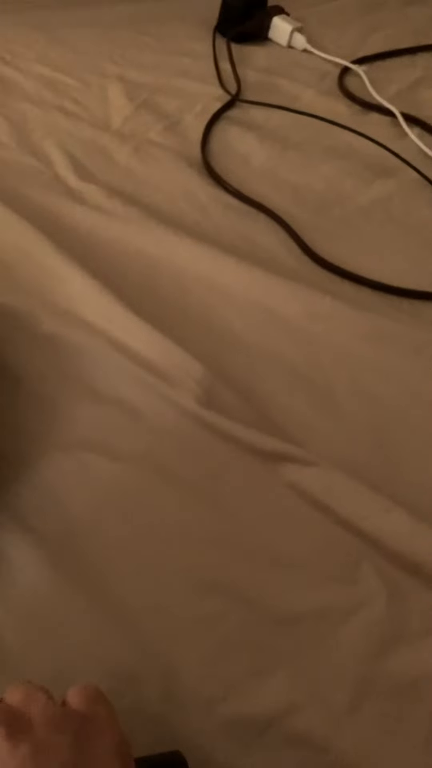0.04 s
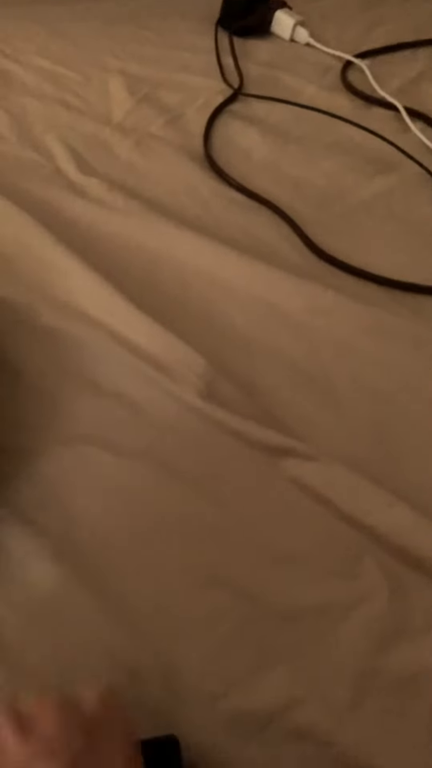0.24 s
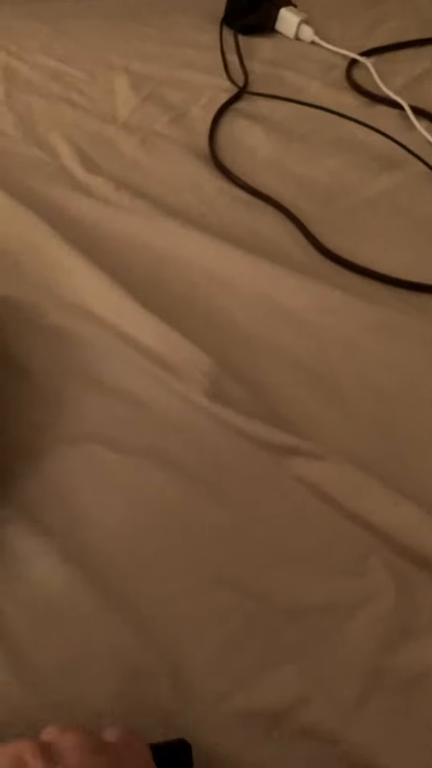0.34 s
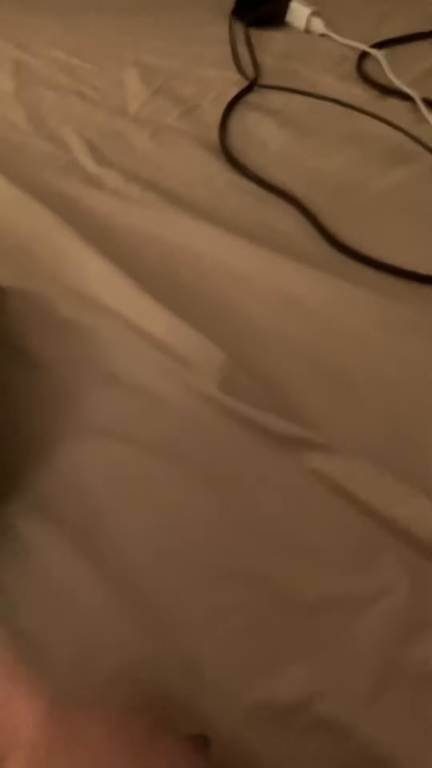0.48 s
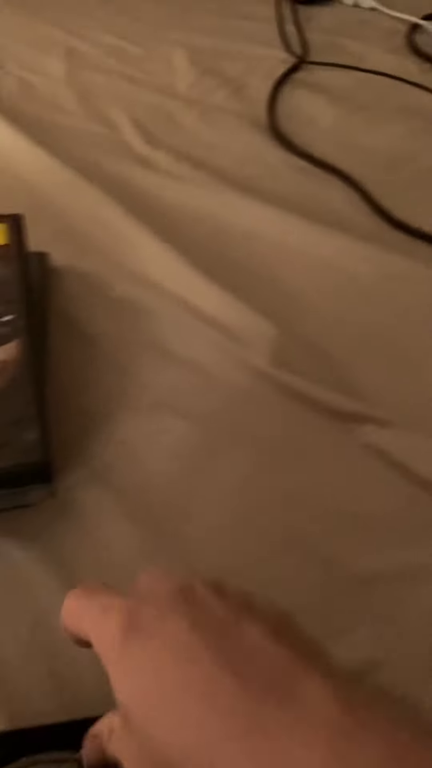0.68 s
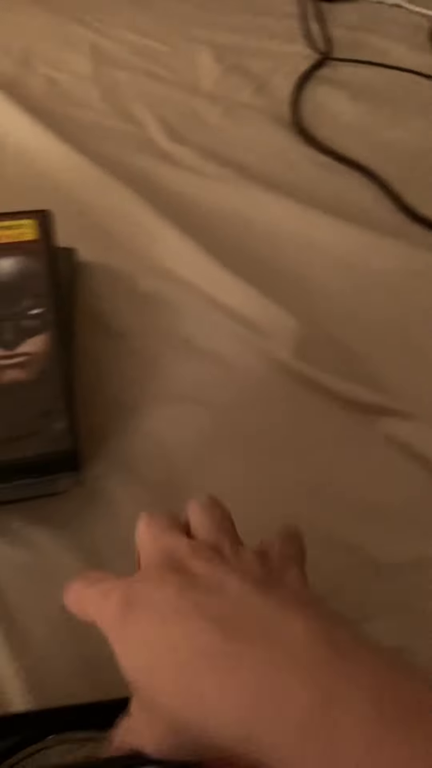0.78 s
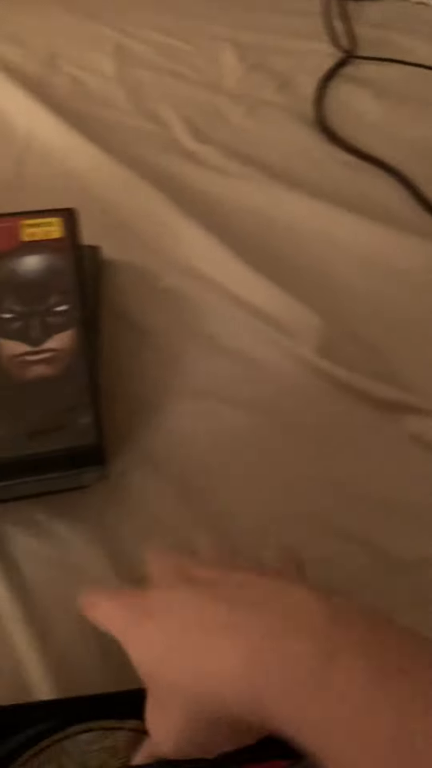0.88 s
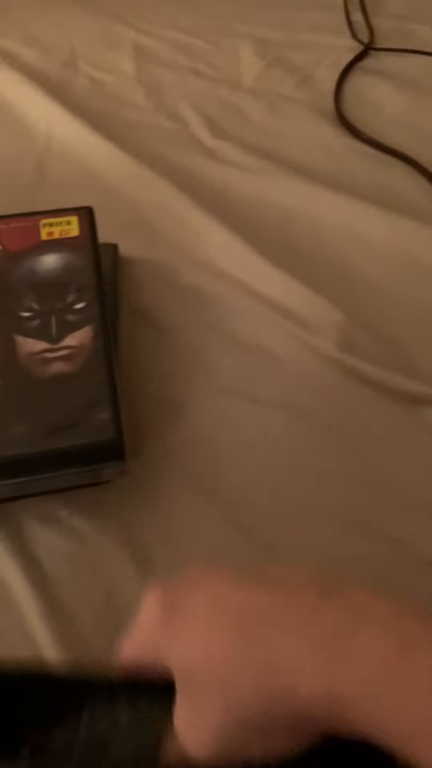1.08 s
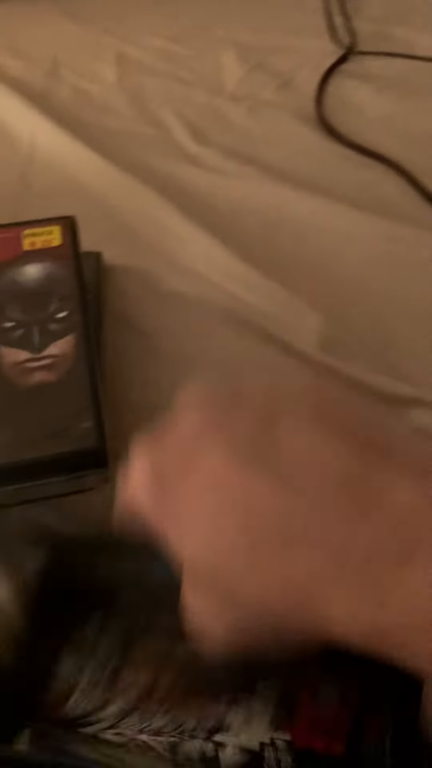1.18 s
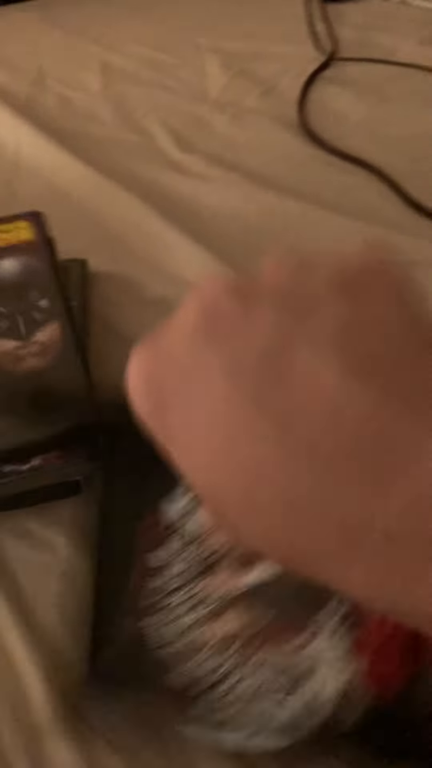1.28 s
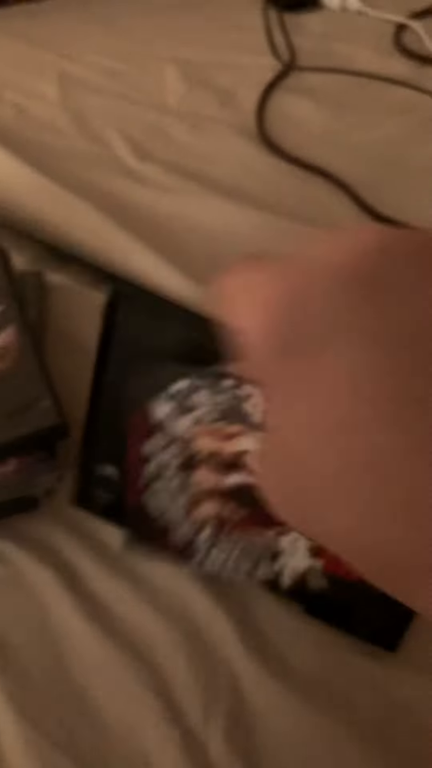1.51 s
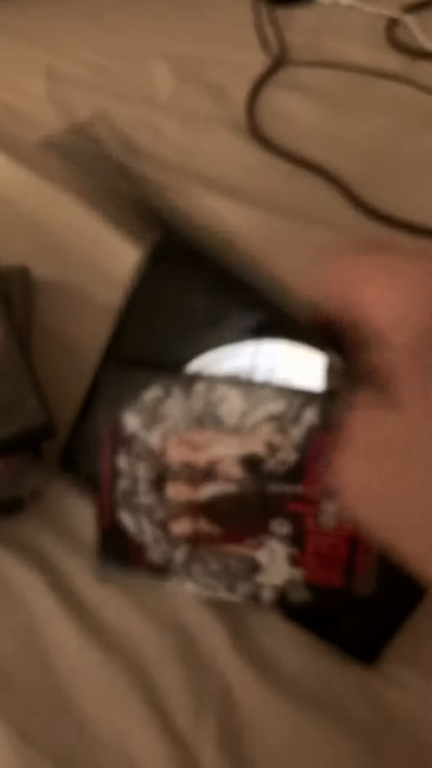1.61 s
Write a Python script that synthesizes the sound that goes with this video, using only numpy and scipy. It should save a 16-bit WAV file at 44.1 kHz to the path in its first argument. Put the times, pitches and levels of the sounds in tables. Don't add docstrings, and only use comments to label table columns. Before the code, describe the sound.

A thin plastic disc case is handled close to a phone in a damped bedroom. After near silence, a loud cluster of cracks with a hollow thump bursts at 0.2 s. Light clicks and slides follow from 0.4 to 0.65, then knocks, loose rattling and rustling from 0.87, a faint finger squeak near 1.13, a second sharp snap at 1.23, and dwindling taps to about 1.6.

```python
import sys
import numpy as np
from scipy import signal
from scipy.fft import rfft, irfft, next_fast_len
from scipy.io import wavfile
from scipy.ndimage import map_coordinates

SR = 44100
rng = np.random.default_rng(int(sys.argv[2]) if len(sys.argv) > 2 else 0)


def put_to_file(sound):
    columns = np.atleast_2d(sound).T
    safe = np.clip(columns, -1, 1)
    whole_steps = np.round(safe * 32767)
    wavfile.write(sys.argv[1], SR, whole_steps.astype(np.int16))


def boost(x):
    u = np.asarray(x, float) / 20
    return 10 ** u


N = 72765

# pitch_hz, level_db [dB per Hz]
AIR_SPECTRUM = [(15, -48.5), (25, 0.5), (140, -3.5), (312, -17.5), (499, -17), (859, -35), (1960, -36.5),
                (7000, -39.5), (9100, -61.5), (15400, -120)]
# pitch_hz, t60_s
ROOM_DECAY = [(200, 0.21), (2000, 0.15), (10000, 0.29)]
# pitch_hz, level_db [dB per Hz]
FILM_SPECTRUM = [(500, -1), (1200, -9), (2500, -6), (4500, -10.5), (6000, 2), (8500, -3.5), (11500, -4.5),
                 (15500, -21.5)]
# pitch_hz, width_hz, level_db
BODY_MODES = [(337, 108, -4), (400.4, 80, -1), (473.6, 102, -2), (591, 126, -2)]
# pitch_hz, width_hz, level_db
SHELL_MODES = [(1021, 190, 0.5), (1380, 195, 8), (1510, 730, 3), (2023, 160, 5), (2694, 250, -1),
               (3986, 870, -0.5), (4900, 1400, -3.5)]
# pitch_hz, width_hz, level_db
FIZZ_MODES = [(5840, 765, 1), (8330, 680, 0), (11000, 1700, -2), (13600, 2500, -21), (16080, 890, -20)]
# start_s, effort_db, body_pressure_db
RUB_GESTURES = [(0.185, -104.5, 17), (0.2, -47, 9), (0.268, -45.5, 1), (0.348, -70, 7.5), (.45, -75, 9),
                (.5, -61.5, -2.5), (0.622, -58.5, -12.5), (.67, -80, -12.5), (0.744, -77.5, -37),
                (0.804, -58, -16), (0.86, -61, -4.5), (0.903, -74, 4), (0.939, -46, 1), (1.03, -59.5, -2),
                (1.146, -63, -1), (1.175, -79, 4), (1.461, -73, 3.5), (1.65, -63, 1.5)]
# start_s, level_db, pitch_hz
THUMP_EVENTS = [(0.215, -28.5, 99), (0.231, -26, 70.4), (0.368, -51.5, 55.5), (0.467, -57.5, 65),
                (0.636, -54, 59.8), (0.912, -42.5, 96.4), (0.947, -42.5, 63), (1.041, -47.5, 123),
                (1.117, -58, 121), (1.257, -40.5, 103), (1.298, -35.5, 81), (1.36, -46.5, 95),
                (1.42, -49, 60), (1.507, -47, 111), (1.549, -45.5, 154)]
# start_s, pitch_hz, level_db
SQUEAK_PATH = [
    (1.113, 2400, -51),
    (1.133, 3100, -50),
    (1.14, 3700, -59),
    (1.152, 4300, -56),
]
# start_s, pitch_hz, level_db
SKID_PATH = [
    (.87, 4900, -52),
    (.885, 5400, -50),
    (.9, 5900, -50),
]
# start_s, shell_db, body_over_shell_db, fizz_over_shell_db
RATTLE_EVENTS = [
    (.9343, -36, -15, -6.5),
    (.958, -40, -5, -11),
    (.9675, -37, -16, 2),
    (1.013, -35, -11, -4),
    (1.0904, -40.5, -22, -10),
    (1.246, -28, 1, -1.5),
    (1.262, -36, 10, -1),
    (1.275, -37.5, -12, 0.5),
]
# start_s, shell_db, body_over_shell_db, fizz_over_shell_db
SLIDE_EVENTS = [(.323, -47, -24, 0), (.4814, -34.5, 7.5, -10.5), (.586, -58, -4, 14),
                (.622, -39.5, 15.5, -13), (.8713, -46, 20.5, 5.5), (.928, -48, 7, -15), (.964, -30, 8, -10),
                (1.008, -60, 12, -17), (1.216, -24, -25, -27), (1.312, -47, 12, 10.5), (1.494, -43, 12, -3),
                (1.508, -43, -12, 14.5)]
# start_s, shell_db, body_over_shell_db, fizz_over_shell_db
TICK_EVENTS = [(.405, -32.5, -1, -12), (.4254, -63, -1, -20), (.44, -51, -5, -26), (.5275, -30, -2, -26),
               (.535, -33, 0.5, -21), (.545, -36, 4, -19), (.557, -52, 11, -9), (.58, -37, 8.5, -14),
               (.9118, -30, 13, -3.5), (.9507, -29.5, 0, -16), (.9985, -24.5, 2.5, -18),
               (1.0536, -33, 7, -5.5), (1.1046, -34, -4, -7), (1.17, -52, -17, -1), (1.1892, -39, 1, -11.5),
               (1.3525, -27, 1.5, -9), (1.3894, -32, 13, -4), (1.4155, -37, 5.5, -3), (1.4387, -39, 5, -9),
               (1.4701, -57.5, 25, 11), (1.48, -55.5, 24, 0), (1.5465, -34.5, 1, 4), (1.6024, -48, -11, 5)]
# start_s, pitch_hz, level_db
NUDGE_RINGS = [(.406, 278, -36), (.528, 1750, -39.5), (.528, 1130, -40.5), (.537, 500, -40),
               (.547, 1655, -41.5), (.558, 436, -34.5), (.581, 575, -45.5), (.586, 407, -35),
               (.625, 394, -36), (.634, 562, -42.5), (.913, 446, -29.5), (.913, 1690, -34),
               (.922, 260, -34.5), (.935, 1570, -42), (.941, 563, -30), (.951, 370, -23),
               (.951, 1540, -31.5), (.969, 404, -28), (.999, 385, -34), (1.014, 487, -36),
               (1.014, 1630, -43), (1.055, 510, -40), (1.353, 1530, -41.5), (1.358, 370, -39),
               (1.391, 1680, -45), (1.394, 370, -31), (1.413, 390, -31.5), (1.496, 273, -34.5),
               (1.503, 1660, -45.5), (1.549, 412, -28.5), (1.556, 330, -29.5), (1.602, 1330, -43)]
# start_s, shell_db, body_over_shell_db, fizz_over_shell_db
CRACK_EVENTS = [(0.2035, -6.5, 5.5, -28), (0.2112, -3, -0.5, -17.5), (0.2231, -17, 19.5, 2.5),
                (0.2287, -7.5, -8, -3.5), (0.2384, -17, 14, 8), (0.242, -12, -13, -24.5),
                (0.2554, -15, 5.5, 4), (0.2622, -11, -32, -9), (0.2824, -60, 1, -21),
                (0.3094, -42, -18, -23), (1.2084, -43, 9, -1), (1.2308, -12, 2, 5),
                (1.2347, -10.5, 9.5, -2), (1.2387, -8.5, -24, -12), (1.2544, -51, 14, -13),
                (1.2934, -29.5, 13.5, 7), (1.2994, -22, 5.5, 8), (1.3054, -23, 17.5, 3.5)]
# start_s, pitch_hz, level_db
PANEL_RINGS = [(.2035, 3820, -13.5), (.204, 560, -7.5), (.204, 2050, -15.5), (.2045, 1230, -13),
               (.208, 3750, -35), (.2115, 3800, -22), (.212, 1335, -10.5), (.216, 238, -12.5),
               (.222, 330, -8.5), (.223, 3240, -37), (.229, 3940, -23.5), (.232, 444, -19),
               (.238, 3470, -33), (.243, 3940, -26), (.245, 177, -14.5), (.255, 4700, -26),
               (.256, 308, -23), (1.225, 2450, -31), (1.23, 2600, -19.5), (1.233, 3800, -22.5),
               (1.2345, 1214, -11.5), (1.235, 350, -9), (1.241, 1496, -18), (1.242, 380, -19.5),
               (1.252, 430, -23), (1.294, 4300, -27.5), (1.294, 4030, -27.5), (1.3, 1540, -29.5),
               (1.304, 550, -18), (1.308, 160, -23)]
# pitch_hz, left_lead_rad
LEAD_BEFORE = [(550, 1.97), (900, 1.9), (1450, 1.73), (2000, 1.54), (2700, -2.5), (3700, 1.34), (4200, 1.1)]
# pitch_hz, left_lead_rad
LEAD_AFTER = [(550, 1.63), (800, 1.28), (1300, 1.02), (2100, -2.1), (2700, 2.05), (3800, 1.5), (4400, 1.57)]
# pitch_hz, left_lead_half_turns
TREBLE_STEPS = [(5250, .96), (5850, 1.04), (7800, 1.96), (9300, 2.05), (11100, 2.98), (12900, 3.02),
                (13800, 3.96), (16000, 4.02)]

AIR_DB, ROOM_DB = -70, -20
DIFFUSE_DB, DIFFUSE_TOP_HZ = -9.5, 5500
SCATTER_DB, SCATTER_T60_S = -13, 0.012
THUMP_T60_S, THUMP_RISE_S = 0.062, 0.0022
CRACK_T60_S, TICK_T60_S, KNOCK_T60_S = 0.014, 0.018, 0.035
RING_T60_S, RING_FASTER, RING_RISE_CYCLES = 0.021, 0.36, 0.48
TURN_S = 0.89
MONO_HZ, BASS_WIDTH = 620, 0.07
RUMBLE_CUT_HZ, TOP_HZ, CEILING = 43.6, 15900, 0.95


def unit(x):
    return x / np.sqrt(np.mean(x ** 2) + 1e-20)


def along(points, hz):
    f, v = np.transpose(points)
    return np.interp(np.log(hz + 1), np.log(f + 1), v)


def wobble(rate):
    knots = rng.standard_normal(int(N / SR * 1000))
    return map_coordinates(knots, [np.arange(N) * min(rate, 900) / SR])


def filtered(x, response):
    m = next_fast_len(N + SR // 2)
    return irfft(rfft(x, m) * response(np.fft.rfftfreq(m, 1 / SR)), m)[..., :N]


def resonate(x, modes):
    def shape(f):
        total = 0
        for k, (hz, width, db) in enumerate(modes):
            total = total + (-1) ** k * boost(db) * 1j * f * width / (hz * hz - f * f + 1j * f * width)
        return total
    return filtered(x, shape) / np.sqrt(np.mean(abs(shape(np.arange(1, SR // 2))) ** 2))


def air():
    level = boost(AIR_DB + 3.0 + 2.5 * wobble(67))
    hum = filtered(rng.standard_normal((2, N)), lambda hz: boost(along(AIR_SPECTRUM, hz)))
    return level * unit(hum)


def room(x):
    hz, t, z = signal.stft(rng.standard_normal((2, SR // 2)), SR, nperseg=256)
    decay = boost(-60 * t / along(ROOM_DECAY, hz)[:, None])
    tail = signal.istft(z * decay, SR, nperseg=256)[1]
    late = np.pad(x, (200, 0))
    return signal.fftconvolve(late[None], tail / np.linalg.norm(tail[0]), axes=1)[:, :N]


def glance(x):
    t = np.arange(SR // 50) / SR
    smear = rng.standard_normal((2, len(t))) * boost(-60 * t / SCATTER_T60_S)
    return signal.fftconvolve(x[None], smear / np.linalg.norm(smear[0]), axes=1)[:, :N]


def slips(rough_db):
    noise = rng.standard_normal(N)
    grip = boost(rough_db * wobble(400) + 3.15 * wobble(59.32))
    return unit(noise * grip)


def rubbing():
    s, effort_db, press_db = np.transpose(RUB_GESTURES)
    t = np.arange(N) / SR
    effort = boost(np.interp(t, s, effort_db, left=-120))
    press = np.interp(t, s, press_db)
    film = boost(10.0) * unit(filtered(slips(rough_db=1), lambda hz: boost(along(FILM_SPECTRUM, hz))))
    body = boost(press + 9.0) * resonate(slips(rough_db=1.5), BODY_MODES)
    shell = boost(press * 1.53 + 6.5) * resonate(slips(rough_db=1.5), SHELL_MODES)
    return effort * (film + body + shell)


def squeak(path):
    s, hz, db = np.transpose(path)
    t = np.arange(N) / SR
    pitch = np.interp(t, s, hz) * (1 + 0.015 * wobble(500))
    level_db = np.interp(t, s, db, left=-150, right=-150) + 3.7 * wobble(150)
    return boost(level_db) * np.sin(2 * np.pi * np.cumsum(pitch) / SR)


def thumps():
    out, t = np.zeros(N + SR), np.arange(SR // 4) / SR
    decay = boost(-60 * t / THUMP_T60_S)
    rise = 1 - np.exp(-t / THUMP_RISE_S)
    ratios = 1.9 + 0.59 * rng.standard_normal((len(THUMP_EVENTS), 2))[:, 1]
    for (s, db, hz), ratio in zip(THUMP_EVENTS, ratios):
        overtone = 0.87 * decay * np.sin(2 * np.pi * ratio * hz * t)
        flex = np.sin(2 * np.pi * hz * t) + overtone
        out[round(s * SR):][:len(t)] += boost(db + 18) * decay * rise * flex
    return out[:N]


def bursts(times, dbs, rise_s, t60_s):
    out, t = np.zeros(N + SR), np.arange(SR // 10) / SR
    shape = (1 - np.exp(-t / rise_s)) * boost(-60 * t / t60_s)
    for s, db in zip(times, dbs):
        puff = shape * rng.standard_normal(len(t))
        puff = puff / np.sqrt(np.sum(puff ** 2) / np.sum(shape ** 2))
        out[round(s * SR):][:len(t)] += boost(db) * puff
    return out[:N]


def contacts(rows, rise_s, t60_s, body_t60_s, shell_db, body_db, fizz_db):
    s, db, low, high = np.transpose(rows)
    shell = resonate(bursts(s, db + shell_db, rise_s, t60_s), SHELL_MODES)
    body = resonate(bursts(s, db + low + body_db, rise_s + 0.0013, body_t60_s), BODY_MODES)
    fizz = resonate(bursts(s, db + high + fizz_db, rise_s, t60_s), FIZZ_MODES)
    return shell + body + fizz


def rings(rows, gain_db):
    out, t = np.zeros(N + SR), np.arange(SR // 8) / SR
    for s, hz, db in rows:
        t60_s = RING_T60_S * (1000 / hz) ** RING_FASTER
        swell = 1 - np.exp(-t * hz / RING_RISE_CYCLES)
        decay = boost(db + gain_db - 60 * t / t60_s)
        out[round(s * SR):][:len(t)] += decay * swell * np.sin(2 * np.pi * hz * t)
    return out[:N]


def rattle():
    return contacts(RATTLE_EVENTS, 0.0016, 0.036, body_t60_s=0.053, shell_db=1, body_db=-4, fizz_db=2.5)


def slides():
    return contacts(SLIDE_EVENTS, 0.023, 0.079, body_t60_s=0.048, shell_db=1.5, body_db=0, fizz_db=9.0)


def ticks():
    taps = contacts(TICK_EVENTS, 0.00051, TICK_T60_S, KNOCK_T60_S, shell_db=-3.0, body_db=-8, fizz_db=0.5)
    return taps + rings(NUDGE_RINGS, gain_db=6)


def cracks():
    snaps = contacts(CRACK_EVENTS, 0.00071, CRACK_T60_S, body_t60_s=0.03,
                     shell_db=-1.5, body_db=-8.5, fizz_db=2.0)
    return snaps + rings(PANEL_RINGS, gain_db=4.5)


def ports(x, lead):
    points = np.transpose(lead)
    return filtered(x, lambda hz: np.exp(0.5j * np.outer([1, -1], np.interp(hz, *points))))


def scene():
    hard = cracks() + ticks()
    case = hard + slides() + thumps() + rubbing() + squeak(SQUEAK_PATH)
    wet = room(case)
    loose = rattle() + squeak(SKID_PATH)
    near = case + loose + boost(ROOM_DB) * wet[0]
    treble = [(hz, np.pi * turns) for hz, turns in TREBLE_STEPS]
    turned = np.clip((np.arange(N) / SR - TURN_S) * 50, 0, 1)
    before = ports(near * (1 - turned), LEAD_BEFORE + treble)
    after = ports(near * turned, LEAD_AFTER + treble[2:])
    diffuse = boost(DIFFUSE_DB) * filtered(wet, lambda hz: 1 / (1 + (hz / DIFFUSE_TOP_HZ) ** 4))
    return before + after + diffuse + air() + boost(SCATTER_DB) * glance(hard)


def band_limit(x):
    return signal.sosfilt(signal.butter(12, 16800, fs=SR, output="sos"), x)


def record(dry):
    mid, side = (dry[0] + dry[1]) / 2, (dry[0] - dry[1]) / 2
    side = filtered(side, lambda hz: BASS_WIDTH + (1 - BASS_WIDTH) / (1 + (MONO_HZ / (hz + 1)) ** 8))
    pair = np.array([mid + side, mid - side])
    pair = filtered(pair, lambda hz: 1 / (1 - 1j * RUMBLE_CUT_HZ / (hz + 1)) ** 2)
    pair = pair / (1 + abs(pair / CEILING) ** 4) ** 0.25
    mix = filtered(pair, lambda hz: 1 / (1 + (hz / TOP_HZ) ** 80))
    return band_limit(mix)


dry = scene()
out = record(dry)
put_to_file(out)
```